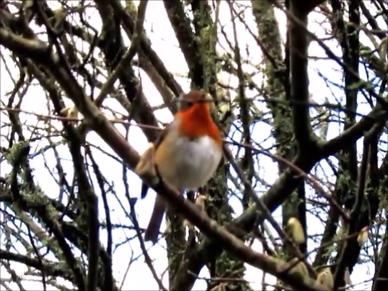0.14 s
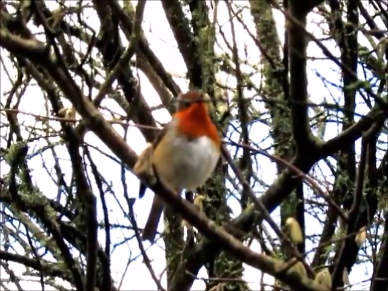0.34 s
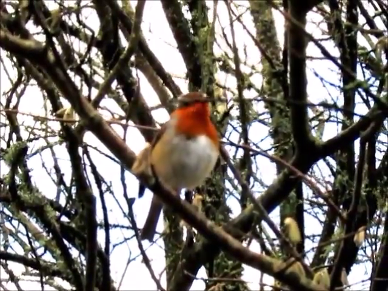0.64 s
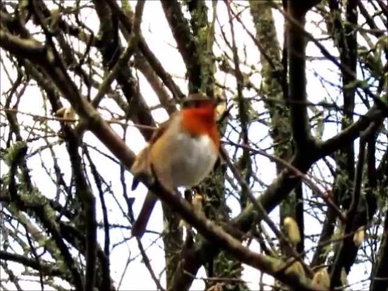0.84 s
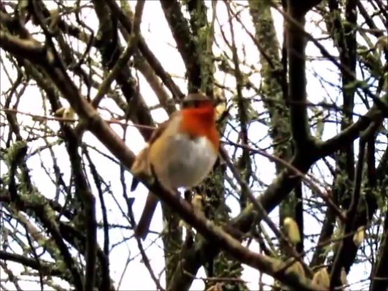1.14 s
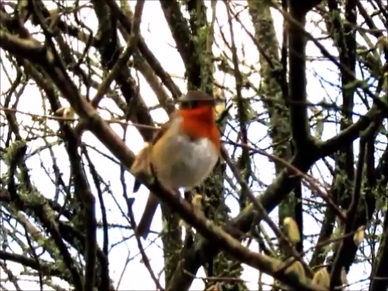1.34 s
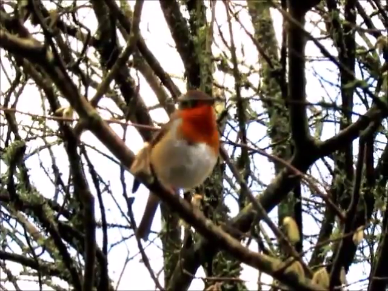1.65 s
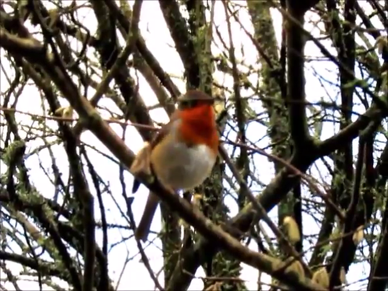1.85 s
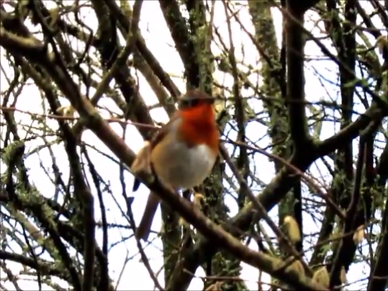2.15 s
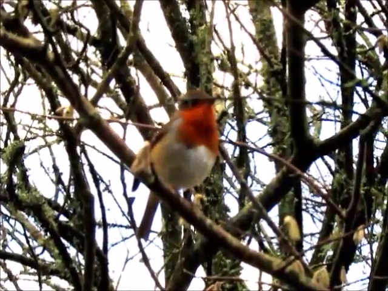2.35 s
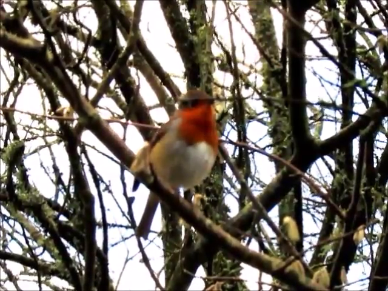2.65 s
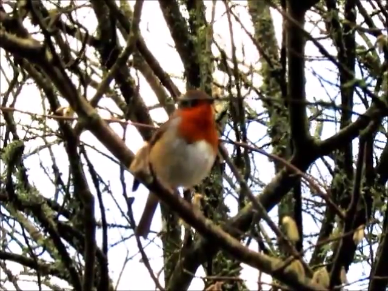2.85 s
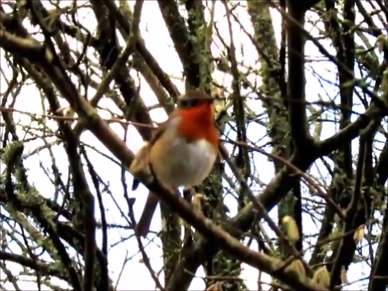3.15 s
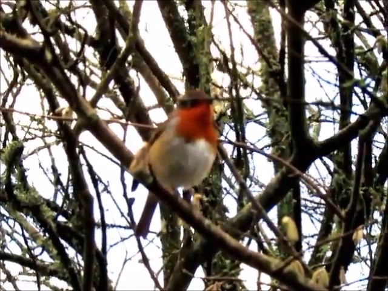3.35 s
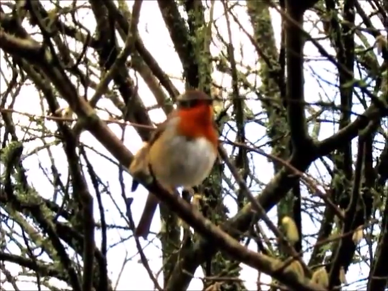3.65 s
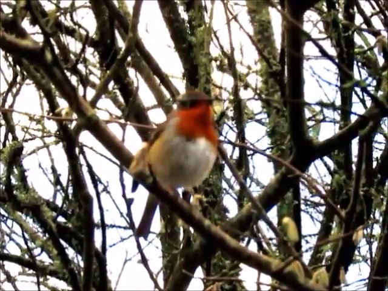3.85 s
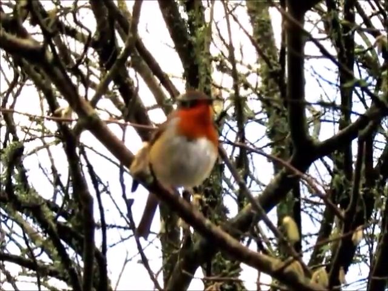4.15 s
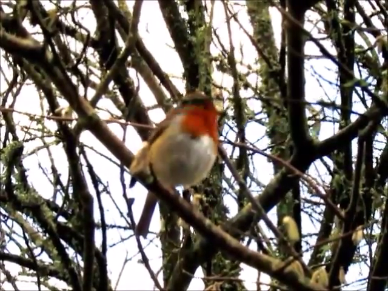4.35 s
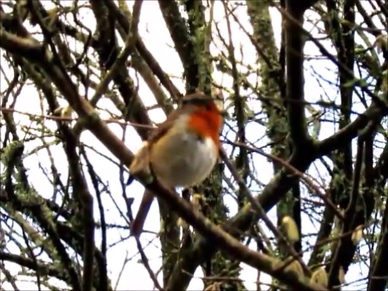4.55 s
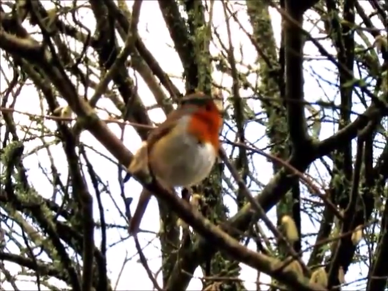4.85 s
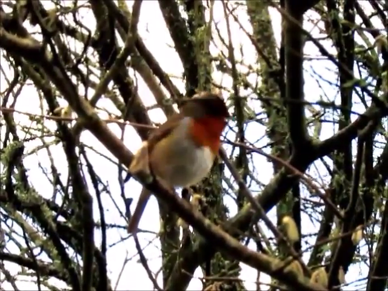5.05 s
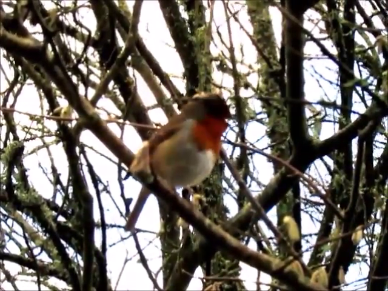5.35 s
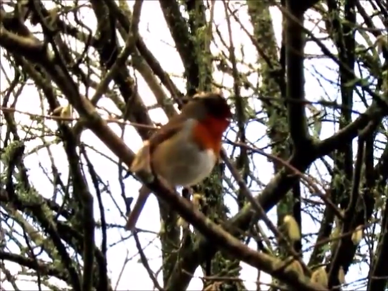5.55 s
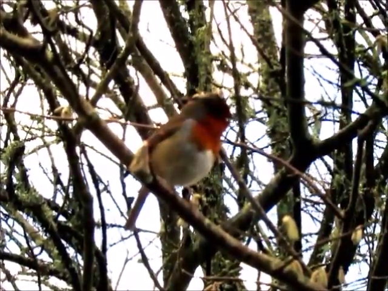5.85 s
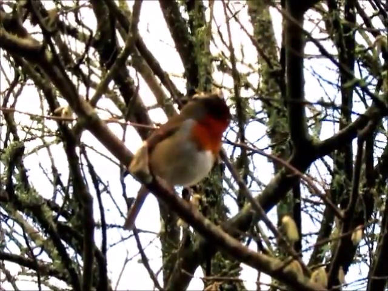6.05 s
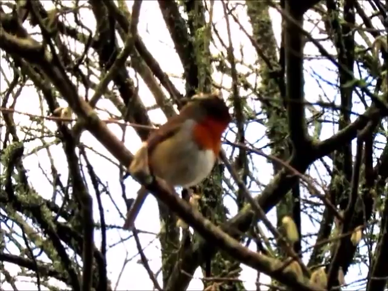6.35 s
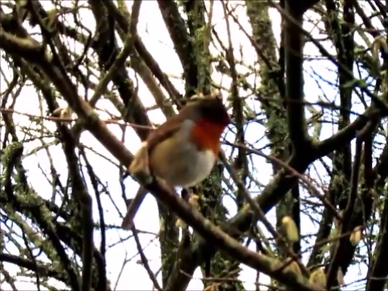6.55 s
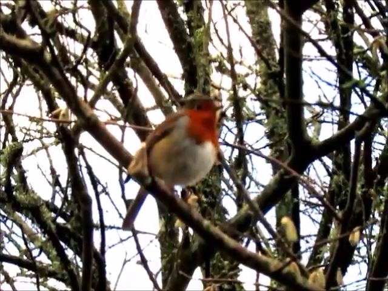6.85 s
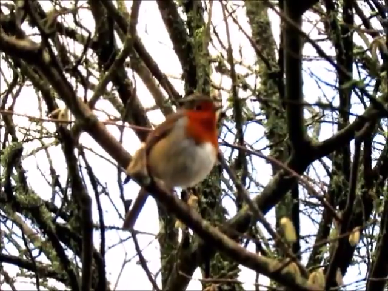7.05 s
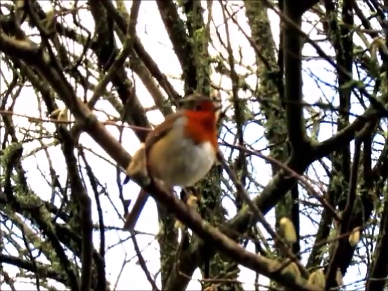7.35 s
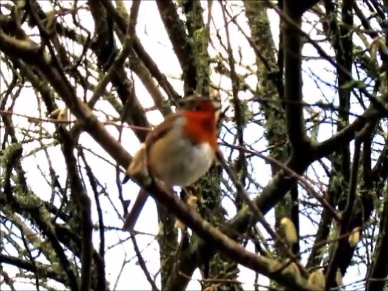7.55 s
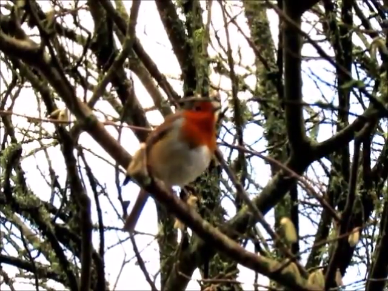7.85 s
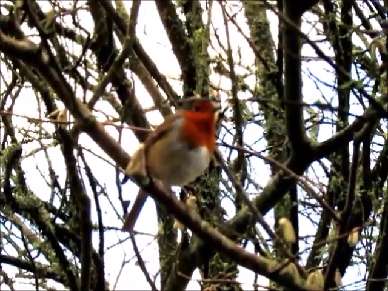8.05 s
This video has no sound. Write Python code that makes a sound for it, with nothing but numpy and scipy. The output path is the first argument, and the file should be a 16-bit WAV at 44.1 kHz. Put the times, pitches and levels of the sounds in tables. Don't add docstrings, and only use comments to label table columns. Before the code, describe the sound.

A robin a few metres away opens with thin, very high seeps, then a rapid zigzagging warble ending on a held whistle and a quick fall. A second robin answers faintly from far off, blurred by echo. After a pause the near bird sings a higher, sharper run of sweeps and chirps that fades away. Distant traffic hums softly under light hiss from a small camera microphone outdoors.

```python
import sys
import numpy as np
from scipy import signal
from scipy.fft import rfft, irfft, next_fast_len
from scipy.io import wavfile
from scipy.ndimage import uniform_filter1d

SR = 44100
rng = np.random.default_rng(int(sys.argv[2]) if len(sys.argv) > 2 else 0)


def dump(signal):
    limited = np.clip(np.atleast_2d(signal).T, -1, 1)
    pcm = np.round(limited * 32767).astype(np.int16)
    wavfile.write(sys.argv[1], SR, pcm)


def undo_db(level):
    steps = np.asarray(level, float) / 20
    return 10 ** steps


N = 361171

# frequency in Hz, density in dB per Hz.
ROAD_SPECTRUM = [(15, -58), (25, -25.5), (40, -11.5), (53, -3), (70, -0.5), (97, -10), (200, -10), (262, 0),
                 (444, -15.5), (539, -12.5), (667, -15), (1200, -18), (1340, -23), (1480, -20.5),
                 (2600, -41.5), (3380, -64.5), (5720, -120)]
# time in seconds, level in dB.
ROAD_LEVEL = [(0.0, -50), (0.84, -50.5), (6.64, -50), (6.91, -49), (8.19, -51)]
MACHINE_LEVEL = [(0, -74.5), (3.0, -76.5), (4.0, -69), (6.2, -67.5), (6.95, -61.5), (7.3, -71),
                 (8.19, -67.5)]
TYRE_LEVEL = [(.3, -70), (.9, -59), (1.5, -66), (2.3, -68), (2.8, -73)]
# frequency in Hz, density in dB per Hz.
HISS_SPECTRUM = [(1180, -10.5), (2000, -6.5), (2700, -11.5), (3920, -10), (4270, -15), (6240, -13),
                 (8020, -13), (11500, -16), (14400, -20.5), (15700, -17)]
# frequency in Hz, side minus mid in dB.
FIELD_WIDTH = [(30, -22), (60, -31), (110, -8), (200, -12), (380, -1), (700, 2), (1290, 0.5), (2380, 1),
               (4400, -4.5), (8120, -2.5), (15000, -1)]
# frequency in Hz, left minus right in dB.
PORT_LEAN = [(200, 0), (700, 1.5), (2400, 0), (15000, .5)]
# frequency in Hz, level in dB.
LINE_WHINE = [(15735, -87.5)]
# start in seconds, level in dB, centre in Hz, T60 in seconds.
BODY_TICKS = [
    (0.13, -37.5, 1480, 0.0053),
    (3.948, -49, 5070, 0.022),
]

# frequency in Hz, gain in dB.
SCATTER_COLOUR = [(1500, -11), (3000, -0.5), (5000, 2.5), (6500, -1), (8000, -7.5), (14000, -9.5)]
# delay in seconds, level in dB.
TRUNK_ECHOES = [
    (0.0183, -24),
    (0.0345, -23),
]
# frequency in Hz, level in dB.
PORT_SKEW = [(2500, -19), (5000, -13), (8000, -9.5), (12000, -6)]

# share of length 0-1, share of the way from first to second pitch
# (below 0 = towards the launch pitch), level in dB.
FLICK_SHAPE = [(0, 0, -5.5), (.45, .57, -0.5), (1, 1, -8.5)]
DROP_SHAPE = [(0, 0, -13), (.35, .3, -3), (.62, .65, 0), (1, 0.99, -6.5)]
FADE_SHAPE = [(0, 0.0077, -4.5), (.22, .35, -1), (.55, .75, -7.5), (1, 0.98, -13.5)]
SLIP_SHAPE = [(0, 0, -9), (.3, .55, -1), (.55, .95, 0), (1, 1, -9)]
SWEEP_SHAPE = [(0, .7, -12), (.16, .28, -3.5), (.34, 0, -4.5), (.6, .25, 0), (1, 0.99, -2.5)]
CASCADE_SHAPE = [(0, -.95, -19), (.13, -.38, -1), (.21, -.14, 0), (.33, 0, -0.5), (.58, .42, -3),
                 (1, 0.94, -2.5)]
CLIMB_SHAPE = [(0, 0, -14), (.3, .55, -1), (.65, .97, -2.5), (1, 0.99, -8)]
CREST_SHAPE = [(0, 0.022, -20), (.2, .42, -2.5), (.45, .85, -3), (.78, 1, -0.5), (1, 0.27, -8)]
PLUNGE_SHAPE = [(0, 0, -4), (.28, .9, 1), (.55, 1, -6), (1, 0.94, -15)]

# start in seconds, length in seconds, first and second pitch in Hz, level in dB.
FAR_DROPS = [(2.915, .02, 4110, 4220, -72.5), (2.98, .012, 5230, 4750, -67),
             (2.995, 0.0089, 4800, 5150, -71), (3.217, 0.02, 7400, 6430, -57.5),
             (3.233, 0.013, 6370, 7300, -66), (3.098, .014, 7300, 6000, -66),
             (3.263, .012, 7500, 6300, -65), (3.375, .03, 4750, 4700, -72), (3.52, .025, 3350, 3300, -65)]
FAR_FADES = [
    (3.022, .03, 6200, 5750, -64),
    (3.47, .06, 3700, 3550, -69),
    (3.66, 0.28, 3500, 3850, -72),
]
FAR_PLUNGES = [(3.085, 0.037, 6770, 5770, -67), (3.265, .04, 7300, 5650, -63.5),
               (3.416, .03, 4300, 3830, -67), (3.443, .065, 4000, 3330, -59.5),
               (3.62, .04, 3900, 3330, -59), (3.545, .04, 3780, 2950, -63)]
# time in seconds, pitch in Hz, level in dB.
FAR_LONG = [(3.64, 3800, -74), (3.69, 3960, -62), (3.73, 4030, -71), (3.8, 4110, -73), (3.955, 4190, -76)]
FAR_CALL = [(7.7, 1540, -66), (7.76, 1480, -55), (7.83, 1440, -66)]

# start in seconds, length in seconds, first and second pitch in Hz, level in dB.
FLICKS = [
    (1.686, .012, 3150, 3500, -52),
    (1.657, .014, 3300, 4200, -44),
    (1.789, 0.011, 2950, 4750, -30),
    (1.941, 0.0097, 3300, 4900, -40),
    (2.416, 0.021, 3600, 4210, -44),
]
DROPS = [(1.64, .019, 3140, 2240, -45), (1.7, .009, 3120, 2950, -39.5),
         (1.697, 0.0097, 4110, 3960, -39.5), (1.835, 0.021, 1750, 1620, -53),
         (2.268, 0.014, 3780, 3690, -47), (2.437, .06, 4050, 3880, -56),
         (4.568, 0.017, 4710, 3000, -45), (4.766, 0.023, 5560, 3080, -39),
                (5.217, .011, 3190, 3350, -39), (5.58, .018, 5750, 5610, -42),
                (5.777, 0.027, 6370, 6130, -38), (5.815, 0.025, 5450, 4400, -43.5),
                (5.823, 0.02, 3910, 4230, -39.5), (6.06, 0.036, 6470, 6220, -47),
                (6.148, .052, 5160, 5030, -54.5), (6.188, 0.032, 5770, 5660, -53),
                (6.28, .052, 4740, 4470, -58.5)]
FADES = [(1.666, 0.014, 2240, 2260, -40.5), (2.491, 0.032, 3480, 2840, -27),
         (2.521, 0.047, 2690, 2280, -36), (5.42, 0.02, 5950, 5980, -37), (5.804, 0.023, 5990, 5500, -33.5),
         (6.03, 0.049, 5050, 5030, -49.5), (6.325, 0.095, 5040, 4880, -61)]
SLIPS = [
    (5.92, .036, 6700, 6300, -33.5),
    (5.944, .026, 5050, 4560, -41),
    (6.081, .022, 4950, 4420, -42.5),
    (6.212, .03, 4720, 4150, -46),
    (6.108, .024, 4550, 4400, -53),
]
SWEEPS = [
    (5.773, .029, 5780, 5250, -38),
    (5.884, .04, 5730, 5330, -43),
    (4.505, .061, 7480, 4180, -50.5),
    (5.648, 0.052, 6200, 5170, -34.5),
]
CASCADES = [
    (4.708, 0.056, 7430, 5150, -45),
]
CLIMBS = [
    (4.992, 0.041, 3730, 4770, -38.5),
    (5.068, 0.044, 3620, 4750, -36),
    (5.149, 0.028, 3900, 4520, -40),
    (5.217, .04, 3750, 4690, -35.5),
]
CRESTS = [
    (5.066, 0.051, 2770, 4336, -34),
    (4.991, .044, 2950, 4080, -37),
    (5.228, 0.0334, 3450, 4150, -39.5),
]

# time in seconds, pitch in Hz, level in dB.
SEEP = [(1.11, 9250, -76), (1.135, 8779, -64), (1.184, 8411, -49), (1.212, 8293, -56), (1.226, 8200, -52),
        (1.25, 8220, -36.5), (1.26, 8100, -50), (1.288, 8061, -37.5), (1.322, 8110, -59)]
SEEP_AGAIN = [(1.33, 8100, -46), (1.345, 8090, -45), (1.37, 8050, -35.5), (1.396, 7960, -30.5),
              (1.435, 7992, -37), (1.457, 8020, -49), (1.5, 8000, -41.5), (1.53, 8010, -58),
              (1.56, 8000, -76)]
OPENER = [(1.614, 3470, -36), (1.619, 3520, -44), (1.622, 3190, -33.5), (1.628, 3240, -33.5),
          (1.634, 4000, -39)]
ZIGZAG = [(1.714, 2930, -50), (1.717, 3540, -34), (1.721, 4960, -45), (1.7235, 4250, -41),
          (1.727, 3590, -31.5), (1.733, 4100, -32), (1.738, 3250, -30.5), (1.741, 2750, -44),
          (1.746, 2450, -54)]
CRACK = [(1.794, 2800, -44), (1.798, 3250, -30), (1.801, 3500, -34), (1.804, 3850, -28), (1.808, 3200, -31),
         (1.811, 2750, -39), (1.815, 2550, -37), (1.819, 2200, -48)]
SKID = [(1.878, 3870, -49), (1.882, 3620, -39.5), (1.886, 2850, -40.5), (1.89, 2590, -35),
        (1.896, 2300, -48)]
CROOK = [(1.947, 2500, -50), (1.952, 2630, -37), (1.958, 2800, -36), (1.963, 2140, -51.5),
         (1.972, 2050, -57)]
PURR = [(1.976, 1919, -64), (1.986, 1855, -49.5), (2.003, 1845, -50.5), (2.016, 1882, -45),
        (2.024, 1930, -58), (2.036, 2060, -48), (2.044, 1896, -50), (2.062, 1910, -63.5)]
PICKUP = [(2.121, 3100, -56), (2.124, 3540, -41), (2.128, 4030, -39), (2.133, 4280, -42),
          (2.139, 4700, -52.5)]
SWOOP = [(2.125, 2600, -55), (2.13, 2960, -44), (2.137, 3280, -32), (2.145, 3710, -34.5),
         (2.151, 3210, -30.5), (2.161, 2890, -36), (2.17, 2650, -33), (2.182, 2360, -40),
         (2.195, 2150, -51.5)]
HELD = [(2.272, 3180, -47), (2.283, 3200, -36), (2.294, 3251, -30), (2.305, 3185, -29), (2.313, 3170, -34),
        (2.325, 3150, -27), (2.333, 3135, -31), (2.342, 3120, -28.5), (2.351, 3105, -36)]
HELD_SWELL = [(2.35, 3105, -34), (2.357, 3095, -29), (2.367, 3092, -31.5), (2.378, 3098, -24),
              (2.386, 3105, -22.5), (2.393, 3170, -36)]
HELD_ON = [(2.392, 3190, -33), (2.397, 3175, -24), (2.405, 3185, -33), (2.413, 3188, -37),
           (2.424, 3175, -33), (2.443, 3156, -27.5), (2.452, 3151, -40), (2.466, 3170, -35),
           (2.48, 3140, -48)]
# time in seconds, pitch in Hz, level in dB.
PLATEAU = [(4.874, 3050, -58), (4.885, 3600, -45), (4.896, 4200, -41), (4.908, 4620, -40),
           (4.925, 4480, -39), (4.942, 4500, -33.5), (4.95, 3900, -44), (4.957, 3020, -56)]
ROOF = [(4.874, 3900, -56), (4.888, 4400, -45), (4.9, 4950, -43.5), (4.912, 5210, -41), (4.924, 5190, -40),
        (4.958, 5155, -47)]
FOOTED = [(5.139, 2900, -50), (5.144, 3120, -41.5), (5.151, 3295, -31.5), (5.156, 3440, -36),
          (5.16, 3740, -40), (5.167, 3960, -37), (5.176, 3970, -38), (5.182, 3500, -40), (5.187, 3050, -50)]
LADDER = [(5.296, 2800, -55), (5.303, 3170, -39), (5.314, 3920, -38.5), (5.325, 4450, -44),
          (5.336, 4500, -48)]
LADDER_TOP = [(5.299, 3570, -55), (5.306, 4150, -45), (5.316, 4820, -45), (5.327, 5380, -43),
              (5.338, 5300, -46)]
TUMBLE = [(5.39, 2926, -54), (5.401, 5600, -33), (5.406, 5960, -35), (5.411, 6090, -41.5),
          (5.416, 5650, -34.5), (5.428, 4890, -38.5), (5.445, 4414, -37.5), (5.458, 4500, -39.5),
          (5.468, 3900, -44)]
ARC = [(5.519, 2900, -54), (5.525, 4680, -44), (5.53, 5730, -36), (5.538, 6250, -34.5), (5.55, 5920, -34),
       (5.568, 5620, -32.5), (5.578, 5400, -39)]
# time in seconds, pitch in Hz, level in dB.
LOW_ARCS = [
    [(5.538, 5150, -50), (5.55, 4950, -43), (5.565, 4650, -42), (5.58, 4250, -39.5), (5.593, 4050, -45)],
    [(5.641, 3000, -62), (5.65, 4300, -45), (5.656, 4850, -44), (5.665, 5180, -44), (5.682, 4900, -46),
     (5.712, 4550, -46)],
]
# number of thirds, level in dB.
TUMBLE_THIRDS = [(2, -8.5), (4, -25), (5, -29)]

# multiple of the pitch, level under the whistle in dB.
OVERTONES = [(2, -25), (3, -34)]
# frequency in Hz, gain in dB.
BEAK_COLOUR = [(3000, -18), (6000, 0.5), (8000, -2.5), (10000, 7), (11500, 2), (13200, -0.5), (14300, -7)]
# time in seconds, level in dB.
BEAK_GAPE = [(1.1, -17), (1.7, -6), (1.9, -2.5), (1.96, 0.5), (2.1, -7), (2.2, -9), (2.3, -15.5), (4.5, 6),
             (4.8, 3.5), (5.1, 0.5), (5.31, -5), (5.4, -2.5), (5.55, -3), (5.7, -1), (6.3, 4.5)]
RUSHING_AIR = [(1.1, -48), (1.7, -38), (1.79, -30), (1.9, -35), (2.12, -31), (2.2, -38), (2.3, -47),
               (4.5, -26), (4.8, -28), (5.35, -32), (5.4, -26), (5.47, -29), (5.7, -28), (5.9, -29),
               (6.3, -27)]
VOICE_COUPLING = [(1.1, -17), (2.6, -19), (4.9, -16), (5.1, -18), (5.5, -18), (5.85, -20), (5.93, -25),
                  (6.3, -25)]


def colour(x, points):
    size = next_fast_len(x.shape[-1])
    hz, db = np.transpose(points)
    f = np.maximum(np.arange(size // 2 + 1) * SR / size, 1)
    gain = undo_db(np.interp(np.log(f), np.log(hz), db))
    return irfft(rfft(x, size) * gain, size)[..., :x.shape[-1]]


def curve(points):
    return undo_db(np.interp(np.arange(N) / SR, *np.transpose(points)))


def walk(rate):
    k = int(SR / rate)
    held = np.repeat(rng.standard_normal(N // k + 1), k)
    return 1.51 * uniform_filter1d(uniform_filter1d(held, k), k)[:N]


def spread(points):
    mid, side = colour(rng.standard_normal((2, N)), points)
    side = colour(side, FIELD_WIDTH)
    lean = np.array(PORT_LEAN) * [1, 0.5]
    both = np.array([colour(mid + side, lean), colour(mid - side, lean * [1, -1])])
    return both / np.sqrt(np.mean(mid ** 2))


def traffic():
    road = spread(ROAD_SPECTRUM)
    engines = colour(road, [(20, -11), (95, -6), (140, -43)])
    road = road + engines * (undo_db(walk(2.5)) - 1)
    drone = spread([(500, -50), (548, 8), (562, -5), (610, -57)]) * curve(MACHINE_LEVEL)
    tyres = spread([(600, -26), (930, 0.5), (1020, -8), (1400, -40.5)]) * curve(TYRE_LEVEL)
    return road * curve(ROAD_LEVEL) * undo_db(0.5 * walk(5)) + drone + tyres


def camera():
    t = np.arange(N) / SR
    out = spread(HISS_SPECTRUM) * undo_db(-68.5 + 0.27 * walk(1.79))
    for hz, db in LINE_WHINE:
        out = out + np.sqrt(2) * undo_db(db) * np.sin(2 * np.pi * hz * t)
    for start, db, hz, t60 in BODY_TICKS:
        decay = undo_db(-60 * np.maximum(t - start, 0) / t60) * (t >= start)
        burst = rng.standard_normal(N) * decay
        burst = colour(burst, [(hz / 8, -4), (hz, 0), (hz * 2, -3), (hz * 2.9, -22)])
        out = out + undo_db(db) * burst / np.abs(burst).max()
    return out


def trees(x, near_db, near_t60, far_db, far_t60, side_db, patchy_db=1.2):
    t = np.arange(SR // 2) / SR
    grains = rng.standard_normal((2, len(t))) * undo_db(patchy_db * walk(300)[:len(t)])
    fall = undo_db(near_db - 60 * t / near_t60) + undo_db(far_db - 60 * t / far_t60)
    onset = np.minimum(t / 0.014, 1)
    mid, side = grains * fall * onset / np.sqrt(SR * 0.009)
    for delay, db in TRUNK_ECHOES:
        mid = mid + undo_db(db) * grains[0] * np.exp(-((t - delay) / 0.00062) ** 2) / 4
    ears = np.array([mid + undo_db(side_db) * side, mid - undo_db(side_db) * side])
    return signal.fftconvolve(colour(x, SCATTER_COLOUR)[None], ears, axes=1)[:, :N]


def strokes(shape, rows):
    launch_hz = 2900
    when, way, rel_db = np.transpose(shape)
    notes = []
    for start, length, first, second, db in rows:
        shift = np.where(way < 0, way * (first - launch_hz), way * (second - first))
        notes.append(np.transpose([start + when * length, first + shift, db + rel_db]))
    return notes


def whistle(notes, flutter_db, wobble, edge_s=0.0018):
    out = np.zeros(N, complex)
    shake_db = flutter_db * walk(160)
    drift = wobble * walk(250)
    for note in notes:
        s, hz, db = np.transpose(note)
        i = np.arange(int(s[0] * SR), int(s[-1] * SR))
        pitch = uniform_filter1d(np.interp(i / SR, s, hz), size=110, mode="nearest")
        edge = np.minimum(np.minimum(i - i[0], i[-1] - i) / (edge_s * SR), 1)
        size = np.sqrt(2) * edge * undo_db(np.interp(i / SR, s, db) + shake_db[i])
        phase = 2 * np.pi * np.cumsum(pitch * (1 + drift[i])) / SR
        out[i] += size * np.exp(1j * phase)
    return out


def far_bird():
    notes = strokes(DROP_SHAPE, FAR_DROPS) + strokes(FADE_SHAPE, FAR_FADES)
    notes += strokes(PLUNGE_SHAPE, FAR_PLUNGES) + [FAR_LONG, FAR_CALL]
    return whistle(notes, flutter_db=2, wobble=0.007).real


def song():
    kinds = [(FLICK_SHAPE, FLICKS), (DROP_SHAPE, DROPS), (FADE_SHAPE, FADES),
             (SLIP_SHAPE, SLIPS), (SWEEP_SHAPE, SWEEPS), (CASCADE_SHAPE, CASCADES),
             (CLIMB_SHAPE, CLIMBS), (CREST_SHAPE, CRESTS)]
    notes = [SEEP, SEEP_AGAIN, OPENER, ZIGZAG, SKID, CROOK, PURR, PICKUP, SWOOP,
             HELD, HELD_SWELL, HELD_ON, CRACK]
    notes += [PLATEAU, ROOF, FOOTED, LADDER, LADDER_TOP, TUMBLE, ARC] + list(LOW_ARCS)
    for shape, rows in kinds:
        notes += strokes(shape, rows)
    for thirds, rel_db in TUMBLE_THIRDS:
        notes.append([(s, hz * round(thirds) / 3, db + rel_db) for s, hz, db in TUMBLE])
    for arc in LOW_ARCS:
        notes.append([(s, 2 * hz, db - 17) for s, hz, db in arc])
    return notes


def beak(voice, rasp_db=-27):
    power = uniform_filter1d(np.abs(voice) ** 2, size=200)
    size = np.sqrt(np.abs(power)) + 1e-6
    swing = voice / np.maximum(size, np.abs(voice) / np.sqrt(2))
    beating = curve(VOICE_COUPLING) * (np.abs(swing) ** 2 - 1)
    shaken = 1 + beating + undo_db(rasp_db) * walk(1200)
    over = sum(undo_db(db) * (size * shaken * swing ** int(k)).real for k, db in OVERTONES)
    air = curve(RUSHING_AIR) * size * rng.standard_normal(N)
    return (voice * shaken).real + colour(over * curve(BEAK_GAPE) + air, BEAK_COLOUR)


def near_bird():
    return beak(whistle(song(), flutter_db=1.7, wobble=0.0023))


def scene():
    near = near_bird()
    far = far_bird()
    quadrature = signal.hilbert(near, next_fast_len(N))[:N].imag
    skew = colour(quadrature, PORT_SKEW)
    direct = near * undo_db(np.array([[-0.8], [-1.3]])) + np.array([skew, -skew])
    direct = direct + far * undo_db(-6.5)
    echoes = trees(near, near_db=-18, near_t60=0.19, far_db=-19.5, far_t60=0.45, side_db=-8)
    echoes = echoes + trees(far, near_db=-4, near_t60=0.16, far_db=-17, far_t60=0.3, side_db=-3)
    return direct + echoes + traffic() + camera()


def low_pass(x):
    return signal.sosfilt(signal.butter(12, 15860, fs=SR, output="sos"), x)


def record(dry):
    mix = colour(dry, [(15790, 0), (15840, -90)])
    return low_pass(mix)


dry = scene()
out = record(dry)
dump(out)
```